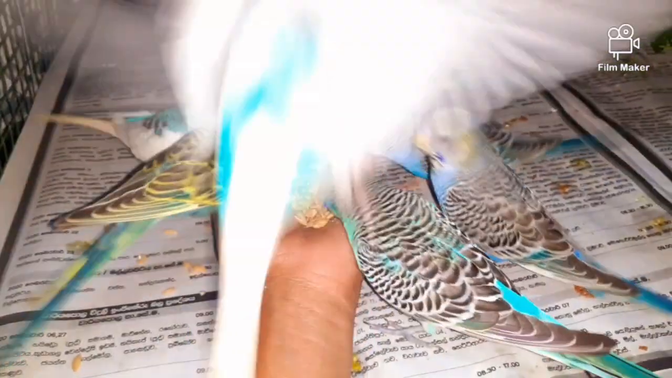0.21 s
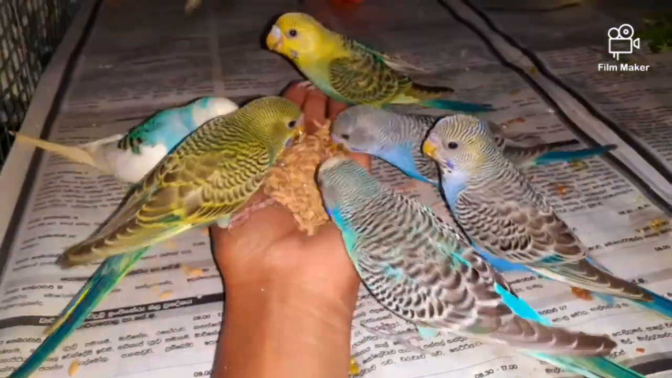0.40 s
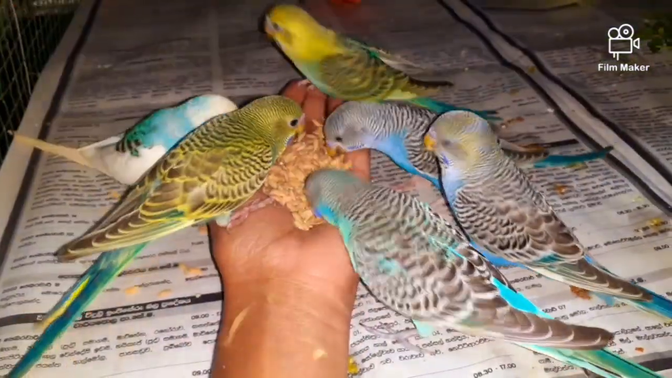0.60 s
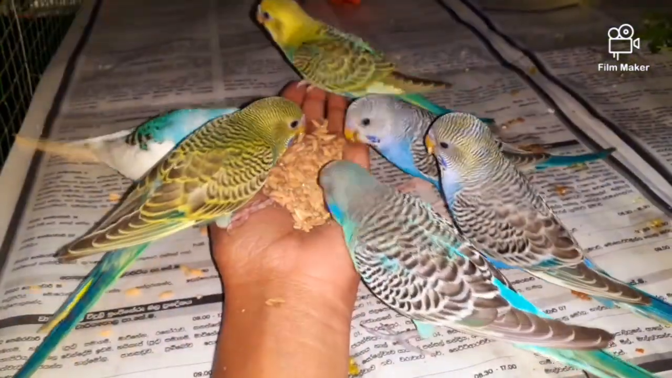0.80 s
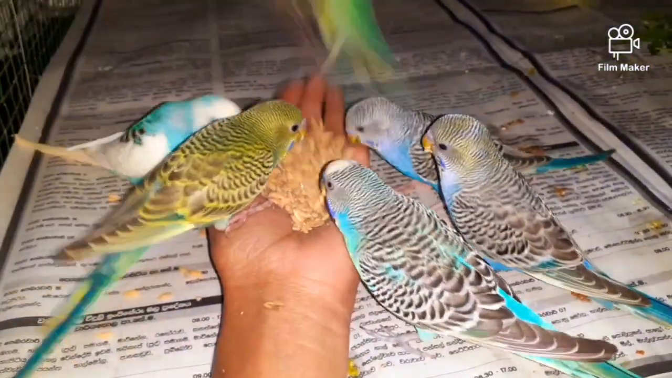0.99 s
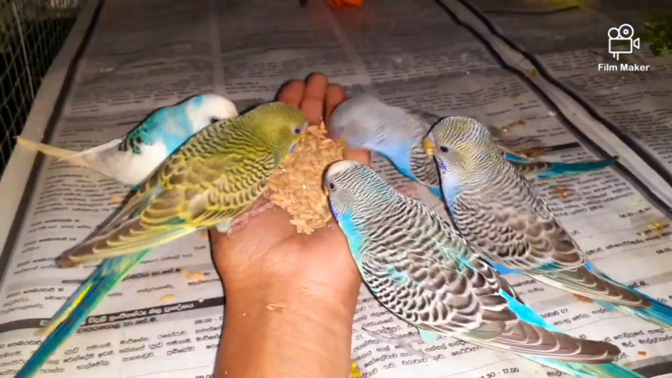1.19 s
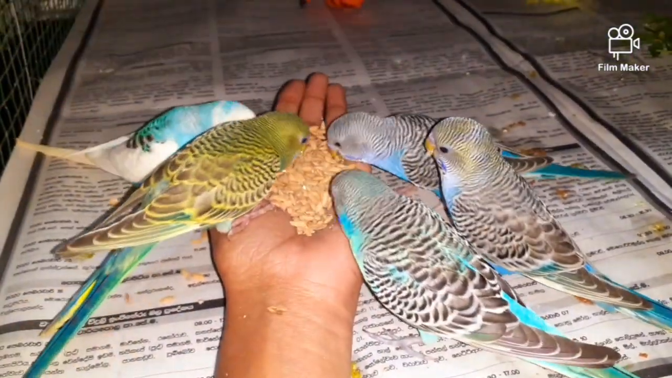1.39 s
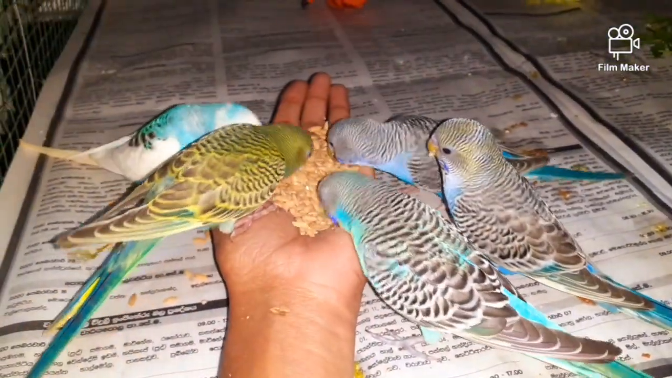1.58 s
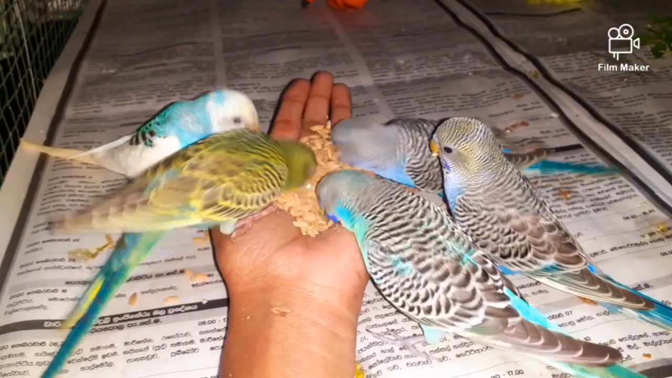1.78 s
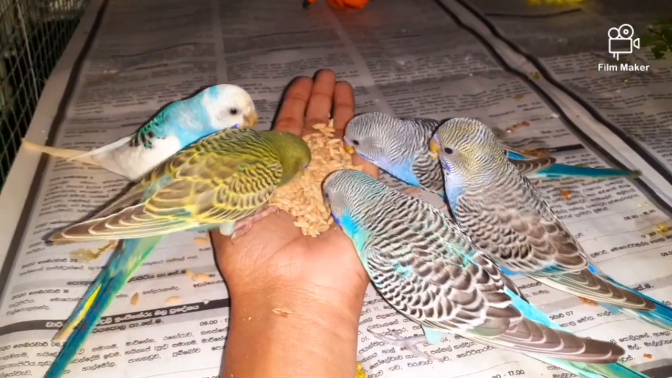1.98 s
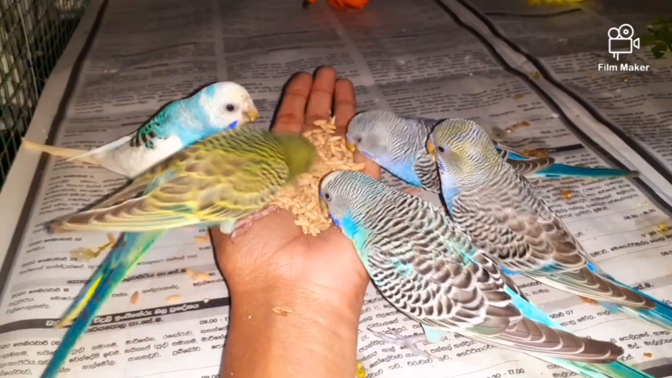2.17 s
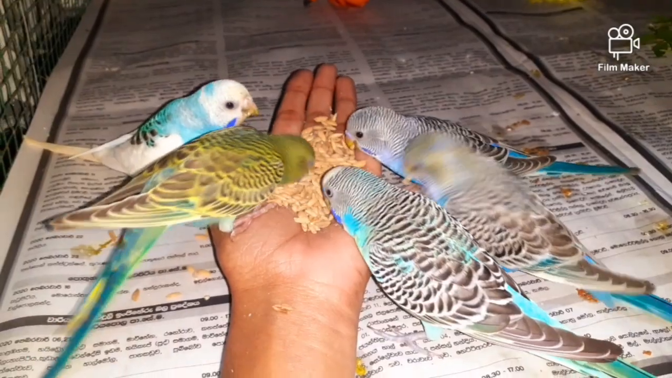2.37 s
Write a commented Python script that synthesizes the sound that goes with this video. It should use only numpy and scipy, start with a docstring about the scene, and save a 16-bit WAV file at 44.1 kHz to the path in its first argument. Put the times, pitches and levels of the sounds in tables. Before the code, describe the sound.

Small parrot wings flutter in two bursts after two sharp chirps, with light seed pecks and paper rustle.

```python
"""A seed cracks over faint rustle; then two sharp chirps (rough harmonic sweeps) close to the microphone.
Budgerigars feed from a hand over newspaper in a small room. One chirps and flaps off; a second takes off,
flutters about and lands. Wings are falling low pulses plus swish and stirred air; beaks are short noise bands;
claws on paper are noise with dull knocks; feathers and paper are crackling hiss.
A thin high squeak, room noise and a faint hum complete it."""
import sys
import numpy as np
from scipy import signal
from scipy.fft import rfft, irfft, next_fast_len
from scipy.io import wavfile
from scipy.ndimage import map_coordinates

SR = 44100
rng = np.random.default_rng(int(sys.argv[2]) if len(sys.argv) > 2 else 0)


def store_pcm(level_fs):
    """Save levels as 16-bit WAV."""
    pcm = np.round(np.clip(level_fs, -1, 1) * 32767).astype(np.int16)
    wavfile.write(sys.argv[1], SR, np.atleast_2d(pcm).T)


N = 105840

# Spectra are relative: colour() brings the result to rms 1.
# chirp contours, one list per chirp, before VOICE_DB: t/s, pitch f/Hz, level/dB
CHIRP_CONTOURS = [
    [(.232, 1450, -42), (.2335, 1480, -34), (.239, 1520, -37), (.2425, 2200, -27), (.245, 2700, -24),
     (.248, 2920, -20.5), (.251, 2500, -25), (.255, 2000, -35)],
    [(.289, 750, -33), (.294, 1191, -32), (.298, 1744, -27), (.301, 1950, -20), (.304, 2380, -19),
     (.3072, 2960, -16), (.310, 2450, -20.5), (.313, 1900, -27)],
]
# chirp harmonics from the first up, at full effort: level/dB
HARMONICS_DB = [-2.5, -0.5, -5, -5]
# chirp response at the left port; also the colour of the room rasp: f/Hz, level/dB
VOICE_LEFT = [(900, -6), (1800, -7), (3000, 4.5), (3550, -10), (4200, -8), (5800, -8), (7000, -14),
              (8600, -6.5), (15000, -28.5)]
# chirp response at the right port: f/Hz, level/dB
VOICE_RIGHT = [(900, -10), (1900, -6.5), (2800, 9.5), (3500, -10), (4000, 5.5), (5900, 0.5), (6900, -11.5),
               (15000, -20)]
# wingbeats, push before pan: t/s, push level/dB, push f/Hz at mid-beat, swish level/dB
WINGBEATS = [(0.271, -34.5, 87, -52.5), (0.315, -30, 105, -42.5), (.374, -24.5, 110, -55.5),
             (.423, -26.5, 114, -34.5), (0.476, -29, 118, -44), (.526, -33.5, 115, -42.5),
             (0.577, -36, 120, -42.5), (0.627, -38.5, 129, -46), (0.742, -54, 110, -57),
             (1.064, -37, 101, -50.5), (1.1022, -35.5, 128, -45.5), (1.1566, -36, 139, -42.5),
             (1.21, -43, 141, -48), (1.264, -44, 130, -49.5)]
# feather swish spectrum: f/Hz, level/dB
SWISH_SPECTRUM = [(60, -29), (200, 5.5), (500, -2.5), (900, -7.5), (1400, -29), (2400, -12.5), (3300, -21),
                  (5000, -22.5), (16000, -33)]
# air stirred by the birds, before flutter: t/s, level/dB
STIRRED_AIR = [(0, -71.5), (.245, -68), (0.259, -47.5), (0.421, -42), (.61, -44.5), (0.669, -50.5),
               (0.781, -56.5), (0.899, -75.5), (1.04, -80.5), (1.059, -50.5), (1.17, -42.5), (1.28, -46),
               (1.35, -55.5), (1.8, -49.5), (1.89, -64), (2.1, -78)]
# stirred air spectrum: f/Hz, level/dB
AIR_SPECTRUM = [(30, -10.5), (55, 4), (110, -3), (230, -2.5), (380, -3.5), (520, -6), (700, -13),
                (1400, -22), (3000, -73.5)]
# pan of the wing pushes: t/s, left minus right/dB
PUSH_PAN = [(.3, 11), (.45, 1.5), (1.1, -2)]
# feather and paper rustle, before trim and flutter: t/s, mids level/dB, treble level/dB
RUSTLE_LEVELS = [(0, -72.5, -67.5), (0.069, -65, -60.5), (.13, -63, -68), (.17, -78, -76),
                 (.235, -91.5, -73.5), (0.269, -48, -44), (.42, -50, -54.5), (.62, -55, -54.5),
                 (.68, -62, -57), (0.799, -61.5, -61), (0.991, -78, -73.5), (1.04, -82, -64.5),
                 (1.069, -67, -56.5), (1.16, -54, -58), (1.35, -59.5, -57.5), (1.58, -66, -64.5),
                 (1.68, -58.5, -60.5), (1.81, -60, -59), (1.881, -70, -68.5), (2.14, -87, -78),
                 (2.221, -73.5, -64.5), (2.34, -75.5, -73)]
# rustle mids spectrum: f/Hz, level/dB
MIDS_SPECTRUM = [(500, -3), (1000, -8.5), (1500, 0), (2450, -0.5), (3000, -4.5), (3500, -23.5), (5000, -20)]
# rustle treble spectrum: f/Hz, level/dB
TREBLE_SPECTRUM = [(2500, -27), (3400, 0.5), (4200, 1.5), (6000, -1.5), (7200, -2.5), (8800, -1),
                   (11000, -7.5), (15800, -2)]
# seed and paper snaps under beaks and claws: t/s, level/dB, centre f/Hz, Gaussian sigma/octaves
SNAPS = [(0.032, -43, 4100, 1.56), (0.7399, -49.5, 9000, 0.97), (.795, -49, 4780, 0.55),
         (0.8927, -49, 7000, 1.4), (1.1106, -39.5, 2540, 0.42), (1.156, -40.5, 2400, 0.42),
         (1.33, -44.5, 1840, 0.85), (1.358, -41, 14900, 0.54), (1.418, -44, 4350, 0.51),
         (1.4459, -44, 2680, 0.44), (1.4743, -45, 13500, 0.37), (1.4989, -47.5, 1710, 0.51),
         (1.665, -45, 2120, 0.67), (1.679, -39, 1860, 0.61), (1.719, -49, 13100, .7),
         (1.779, -38, 1390, 0.94), (2.0008, -39.5, 8480, 1.63), (2.064, -51.5, 10040, 0.46),
         (2.0818, -45, 13940, 1.34), (2.2886, -49.5, 8500, 3.2), (2.367, -37.5, 6000, 0.66)]
# claw scuffs and soft footfalls, before the scrape and knock gains: t/s, level/dB, knock f/Hz
CLAW_SCUFFS = [(.441, -39.5, 454), (.493, -33, 505), (0.588, -35, 322), (1.057, -44, 542),
               (1.099, -37.5, 300), (1.156, -39.5, 488), (1.209, -39, 292), (1.27, -44.5, 517),
               (1.499, -44, 323), (1.566, -44, 330), (1.622, -46, 509), (1.673, -43, 515),
               (1.733, -46, 573), (1.777, -42.5, 554)]
# scrape spectrum: f/Hz, level/dB
SCRAPE_SPECTRUM = [(100, -23.5), (300, -12), (520, 3), (800, -9.5), (1250, -9.5), (2400, -24.5),
                   (3400, -25.5), (15000, -23)]
# perch modes, before pan: f/Hz, level/dB, T60/s
PERCH_MODES = [(314, -37.5, 0.22), (546, -49, 0.095)]
# room noise spectrum: f/Hz, level/dB
FLOOR_SPECTRUM = [(30, -33.5), (110, -3), (190, -19.5), (300, 5.5), (420, -12.5), (1000, -26),
                  (2000, -45.5), (2500, -7), (3400, -36.5), (4400, -16.5), (10000, -19), (15000, -11.5)]
# hum tones, mean level before wander: f/Hz, level/dB
HUM_TONES = [(308, -75), (113.2, -84)]
# left-right correlation of diffuse sound: f/Hz, correlation/1
LIKENESS = [(60, 0.83), (290, 0.77), (640, 0.75), (1400, 0.057), (3100, 0.037)]
# balance of diffuse sound: f/Hz, left minus right/dB
BALANCE = [(60, -4.5), (380, -7), (1000, -2), (2400, -11), (4400, -4), (8000, -5), (15000, 2)]
# room decay: f/Hz, T60/s
ROOM_DECAY = [(100, 0.68), (2500, 0.18), (5500, 0.26), (14000, 0.29)]

VOICE_DB, VOICE_RASP_DB = 0.5, -11  # rasp sounds along with the tone
VOICE_ROUGH, VOICE_JITTER = 0.32, 0.018  # relative amplitude and pitch wobble
VOICE_BRIGHTENS = 0.62  # third harmonic and up grow faster than the effort
VOICE_ROOM_DB, VOICE_ROOM_RASP_DB = -10.5, -9.5  # this rasp is heard only via the room
PUSH_SIGMA_S, PUSH_SAG_S = 0.0061, 0.01  # pulse width; time constant of the pitch fall
SWISH_SIGMA_S, WING_ROOM_DB = 0.012, -14
CRACKLE_PER_S, CRACKLE_DB, RUSTLE_TRIM_DB = 120, -1, -4.0
SNAP_T60_S, SNAP_ROOM_DB = 0.007, -3.5
SCUFF_T60_S, SCUFF_RISE_S = 0.062, 0.002
KNOCK_DB, SCRAPE_DB = 3.5, -4
LANDING_S, LANDING_RISE_S = 1.782, 0.0053
SQUEAK_S, SQUEAK_HZ, SQUEAK_DB, SQUEAK_SIGMA_S = 1.822, 11400, -55, 0.007
FLOOR_DB = -68
PORT_LEAD_S, TOP_HZ = 0.00016, 15900


def amp(db):
    """Decibels to gain."""
    return 10 ** (np.asarray(db) / 20)


def unit(x):
    """Scale to rms 1."""
    return x / np.sqrt(np.mean(x ** 2) + 1e-20)


def clock():
    """Time of every sample, s."""
    return np.arange(N) / SR


def along(points, hz):
    """Interpolate (Hz, value) points on a log-frequency axis."""
    f, v = np.transpose(points)
    return np.interp(np.log(hz + 1), np.log(f + 1), v)


def level(s, db):
    """Gain curve through dB points, silent outside them."""
    inside = (clock() >= s[0]) * (clock() <= s[-1])
    return amp(np.interp(clock(), s, db)) * inside


def wobble(knots_per_s):
    """Smooth random curve through normally distributed knots."""
    knots = rng.standard_normal(int(N * knots_per_s / SR) + 4)
    return map_coordinates(knots, [clock() * knots_per_s])


def bell(t, sigma_s):
    """Gaussian pulse of height 1 about t = 0."""
    return np.exp(-(t / sigma_s) ** 2 / 2)


def filtered(x, response):
    """Apply a frequency response to x."""
    n = x.shape[-1]
    m = next_fast_len(n + 8192)
    hz = np.fft.rfftfreq(m, 1 / SR)
    return irfft(rfft(x, m) * response(hz), m)[..., :n]


def split_db(left_minus_right_db):
    """Left and right gains for a level difference."""
    return amp(np.outer([.5, -.5], left_minus_right_db))


def spread(pair):
    """Mix two unrelated noises to the ports' correlation (high in the bass) and balance."""
    def mid_side(hz):
        angle = np.arccos(np.clip(along(LIKENESS, hz), -1, 1)) / 2
        return np.array([np.cos(angle), np.sin(angle)])

    mid, side = filtered(pair, mid_side)
    stereo = np.array([mid + side, mid - side])
    return filtered(stereo, lambda hz: split_db(along(BALANCE, hz)))


def colour(x, spectrum):
    """Shape x by a spectrum, at rms 1."""
    return unit(filtered(x, lambda hz: amp(along(spectrum, hz))))


def rush(spectrum):
    """Coloured stereo noise of rms 1."""
    return colour(spread(rng.standard_normal((2, N))), spectrum)


def room(x):
    """Diffuse room answer to a mono sound: decaying noise in which the bass lingers longest."""
    hz, t, z = signal.stft(rng.standard_normal((2, SR // 2)), SR, nperseg=256)
    decay = amp(-60 * t / along(ROOM_DECAY, hz)[:, None])
    tail = spread(signal.istft(z * decay, SR)[1])
    tail = tail / np.sqrt(np.sum(tail ** 2) / 2)
    tail = np.pad(tail, ((0, 0), (110, 0)))  # 2.5 ms predelay
    return signal.fftconvolve(x[None], tail, axes=1)[:, :N]


def chirps():
    """Rough arching sweeps, strong second harmonic; the room returns a broader, raspier sound."""
    voice, room_rasp = np.zeros((2, N)), np.zeros(N)
    for contour in CHIRP_CONTOURS:
        s, hz, db = np.transpose(contour)
        effort = level(s, db + VOICE_DB)
        pitch_hz = np.interp(clock(), s, hz) * (1 + VOICE_JITTER * wobble(1500))
        phase = 2 * np.pi * np.cumsum(pitch_hz) / SR
        bright = (effort / effort.max()) ** VOICE_BRIGHTENS
        tone = np.zeros(N)
        for k, harmonic_db in enumerate(HARMONICS_DB):
            gain = amp(harmonic_db) * bright ** max(k - 1, 0)
            tone += gain * np.sin((k + 1) * phase) * (1 + VOICE_ROUGH * wobble(1200))
        rasp = amp(VOICE_RASP_DB) * rng.standard_normal((2, N))
        voice += effort * (tone + rasp)
        room_rasp += effort * colour(rng.standard_normal(N), VOICE_LEFT)
    direct = filtered(voice, lambda hz: amp([along(VOICE_LEFT, hz), along(VOICE_RIGHT, hz)]))
    to_room = direct.mean(axis=0) + amp(VOICE_ROOM_RASP_DB) * room_rasp
    return direct + amp(VOICE_ROOM_DB) * room(to_room)


def wings():
    """Each downstroke pushes a puff of air that falls in pitch, and swishes through the feathers."""
    push, swish = np.zeros(N), np.zeros(N)
    for s, push_db, hz, swish_db in WINGBEATS:
        t = clock() - s
        # integral of a decaying frequency; the floor keeps the exponential finite
        cycles = hz * PUSH_SAG_S * (1 - np.exp(-np.maximum(t / PUSH_SAG_S, -2)))
        push -= amp(push_db) * np.cos(2 * np.pi * cycles) * bell(t, PUSH_SIGMA_S)
        swish += amp(swish_db) * bell(t, SWISH_SIGMA_S)
    pan = split_db(np.interp(clock(), *np.transpose(PUSH_PAN)))
    flutter = amp(1.52 * wobble(39.44))
    air = level(*np.transpose(STIRRED_AIR)) * flutter * rush(AIR_SPECTRUM)
    return pan * push + amp(WING_ROOM_DB) * room(push) + swish * rush(SWISH_SPECTRUM) + air


def pecks():
    """A husk snaps in the beak: a short noise burst around one pitch."""
    out, t = np.zeros((2, N + SR)), np.arange(SR // 20) / SR
    for s, db, centre_hz, octaves in SNAPS:
        def band(hz):
            return bell(np.log2((hz + 1) / centre_hz), octaves) * (hz < TOP_HZ)

        burst = unit(filtered(rng.standard_normal((2, len(t))), band))
        start = round(s * SR)
        out[:, start:start + len(t)] += amp(db - 60 * t / SNAP_T60_S) * burst
    return out[:, :N] + amp(SNAP_ROOM_DB) * room(out[0, :N])


def feet():
    """Scuffs scrape the paper, each with a dull pitched knock; a landing rings the perch."""
    scuffs, knocks = np.zeros(N), np.zeros(N)
    for s, db, hz in CLAW_SCUFFS:
        t = np.maximum(clock() - s, 0)
        stroke = amp(db - 60 * t / SCUFF_T60_S) * (1 - np.exp(-t / SCUFF_RISE_S))
        scuffs += stroke
        knocks += stroke * np.sin(2 * np.pi * hz * t)
    t = np.maximum(clock() - LANDING_S, 0)
    ring = sum(amp(db - 60 * t / t60_s) * np.sin(2 * np.pi * hz * t) for hz, db, t60_s in PERCH_MODES)
    ring = ring * (1 - np.exp(-t / LANDING_RISE_S))
    scrape = amp(SCRAPE_DB) * scuffs * rush(SCRAPE_SPECTRUM)
    return scrape + (ring + amp(KNOCK_DB) * knocks) * amp([[-2], [2]])  # left, right dB


def rustle():
    """Feathers and newspaper: fluttering hiss with sparse random crackles."""
    s, mids_db, treble_db = np.transpose(RUSTLE_LEVELS)
    flutter_db = 2.13 * wobble(75)
    out = np.zeros((2, N))
    for db, spectrum in ((mids_db, MIDS_SPECTRUM), (treble_db, TREBLE_SPECTRUM)):
        grains = (rng.random(N) < CRACKLE_PER_S / SR) * rng.standard_normal((2, N))
        texture = rush(spectrum) + amp(CRACKLE_DB) * colour(spread(grains), spectrum)
        out += amp(np.interp(clock(), s, db) + flutter_db + RUSTLE_TRIM_DB) * texture
    return out


def squeak():
    """Brief, thin high tone with wavering phase that lingers in the room."""
    t = clock() - SQUEAK_S
    carrier = np.sin(2 * np.pi * SQUEAK_HZ * t + wobble(400))
    tone = amp(SQUEAK_DB) * bell(t, SQUEAK_SIGMA_S) * carrier
    return tone + room(tone)


def background():
    """Steady coloured room noise and a hum of sines wavering in level and phase."""
    hum = np.zeros(N)
    for hz, db in HUM_TONES:
        gain = amp(db + 2 * wobble(4.4))
        hum += gain * np.sin(2 * np.pi * hz * clock() + 0.46 * wobble(15.0))
    return amp(FLOOR_DB) * rush(FLOOR_SPECTRUM) + hum


def ports(pair):
    """Linear phase shift: the left port hears everything PORT_LEAD_S before the right."""
    return filtered(pair, lambda hz: np.exp(np.outer([1, -1], 1j * np.pi * hz * PORT_LEAD_S)))


def scene():
    """Sum of the birds and the room around them, at the two ports."""
    return ports(chirps() + wings() + pecks() + feet() + rustle() + squeak() + background())


def record(dry):
    """Zero-phase band limit: drops the deep bass and everything above TOP_HZ."""
    low_cut = signal.butter(2, 40, "highpass", fs=SR, output="sos")

    def response(hz):
        return abs(signal.sosfreqz(low_cut, hz, fs=SR)[1]) ** 2 * (hz < TOP_HZ)

    return filtered(dry, response)


dry = scene()
out = record(dry)
store_pcm(out)
```